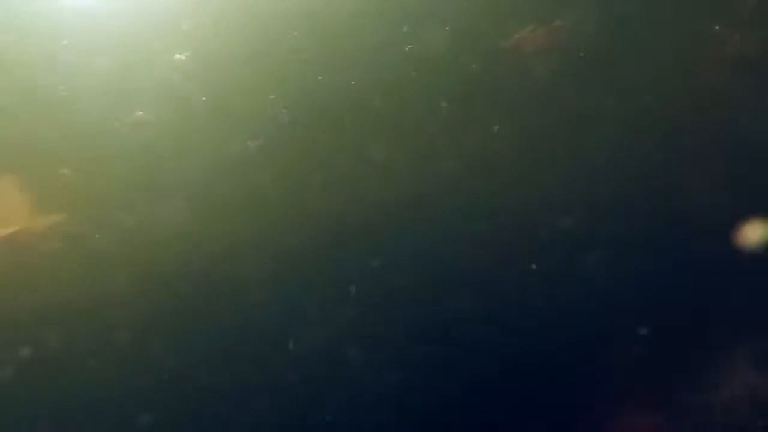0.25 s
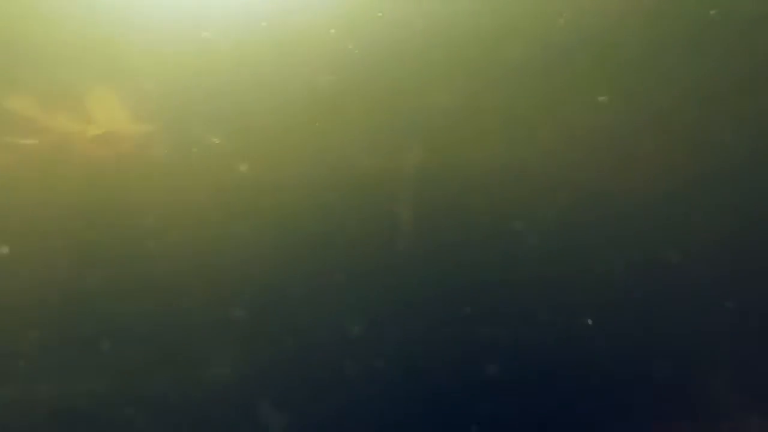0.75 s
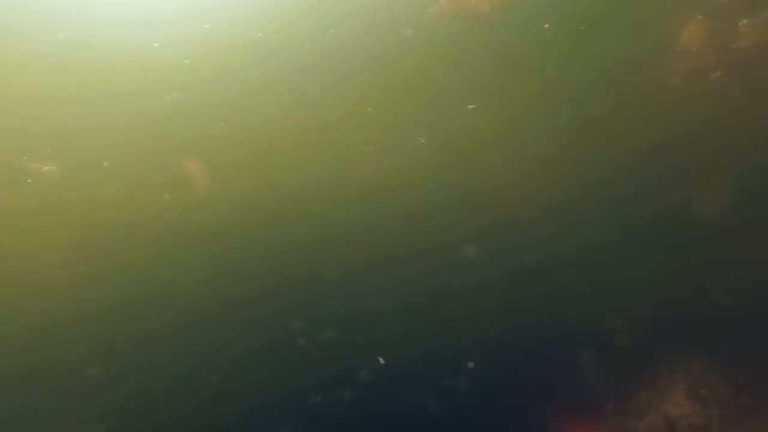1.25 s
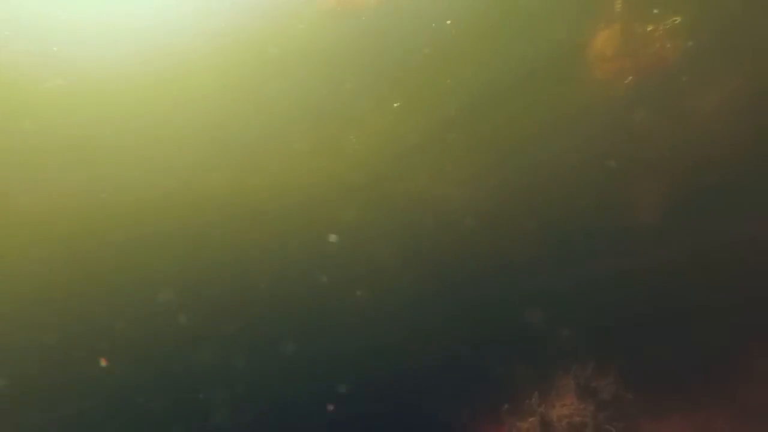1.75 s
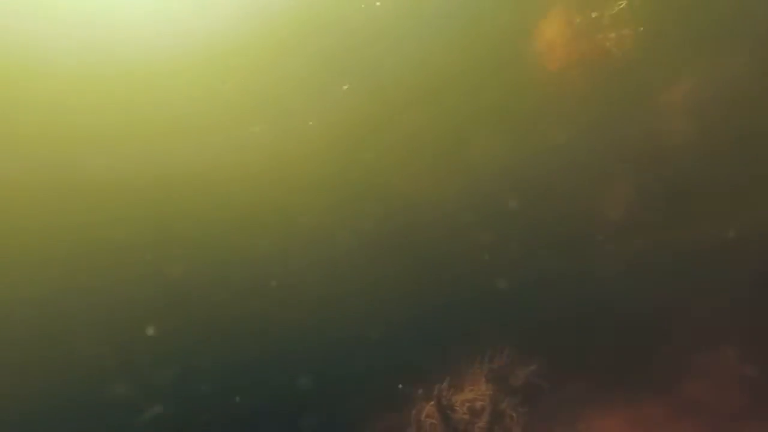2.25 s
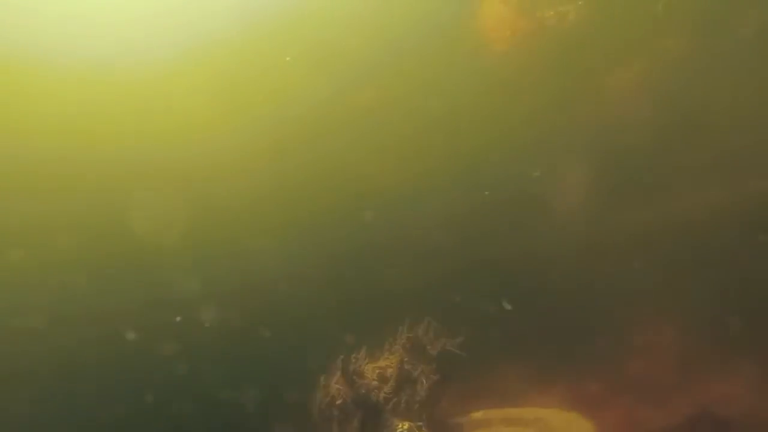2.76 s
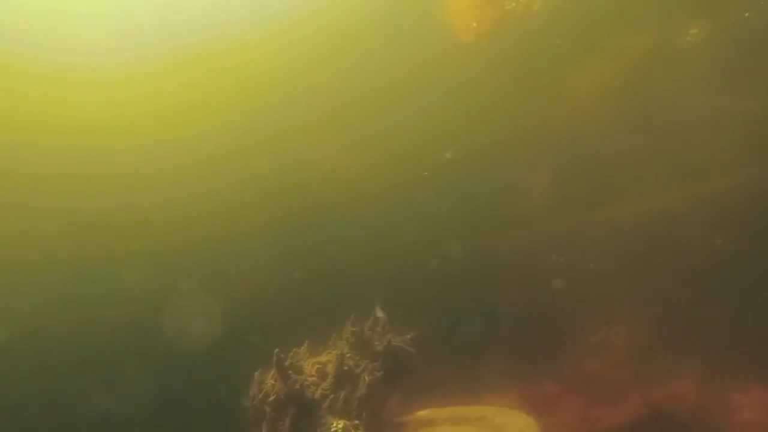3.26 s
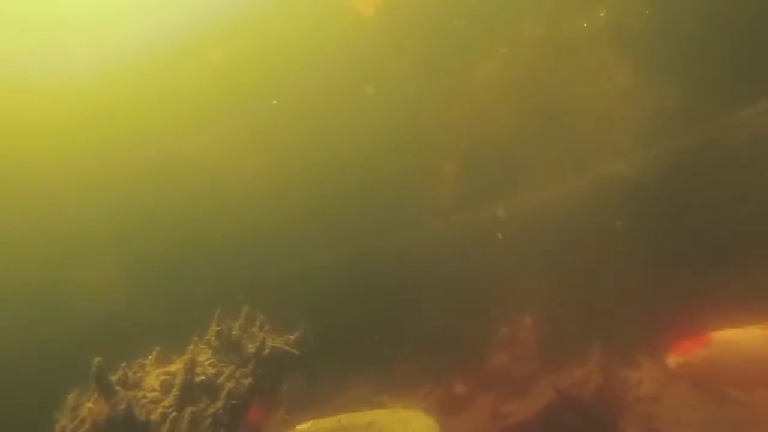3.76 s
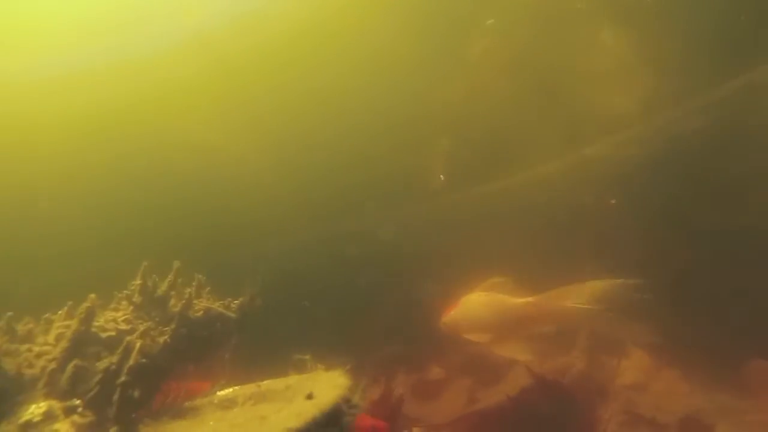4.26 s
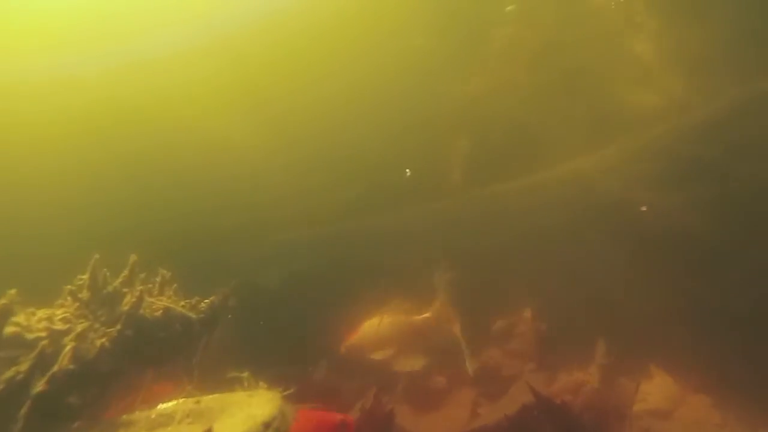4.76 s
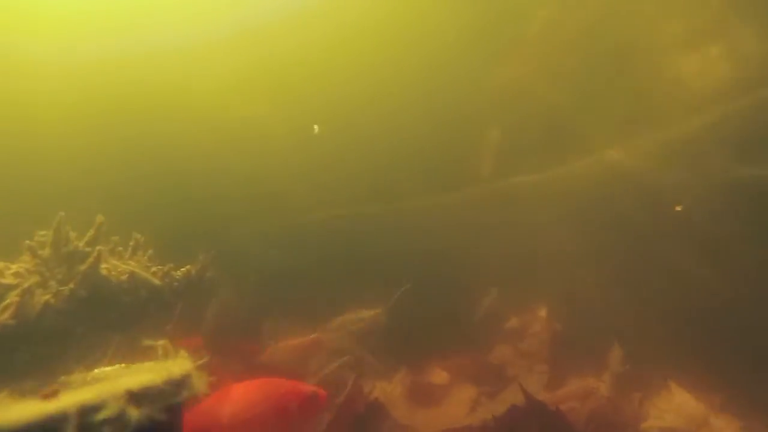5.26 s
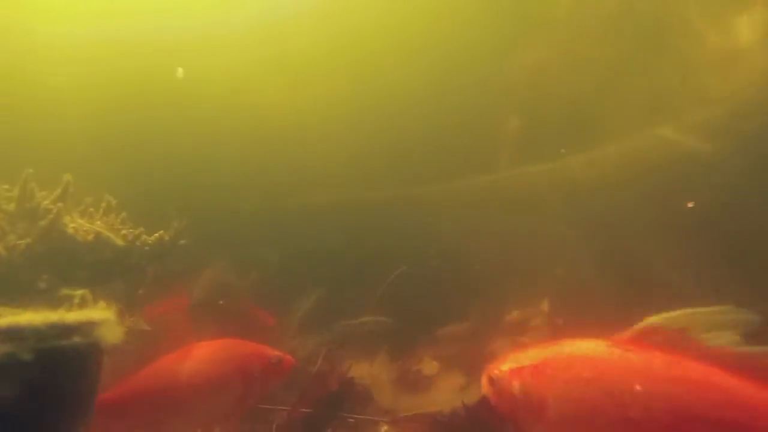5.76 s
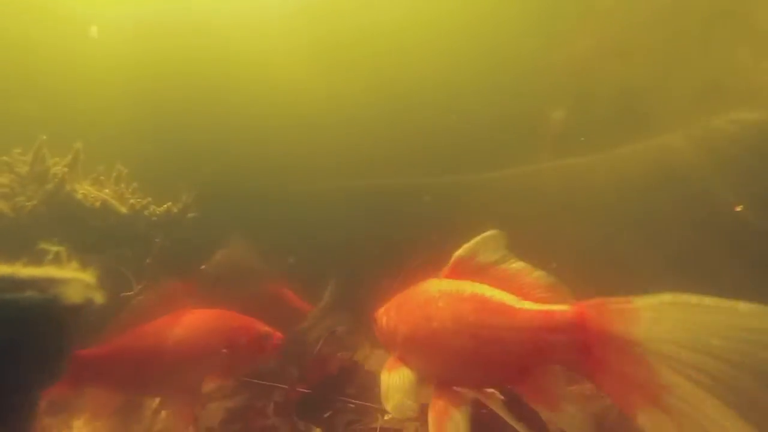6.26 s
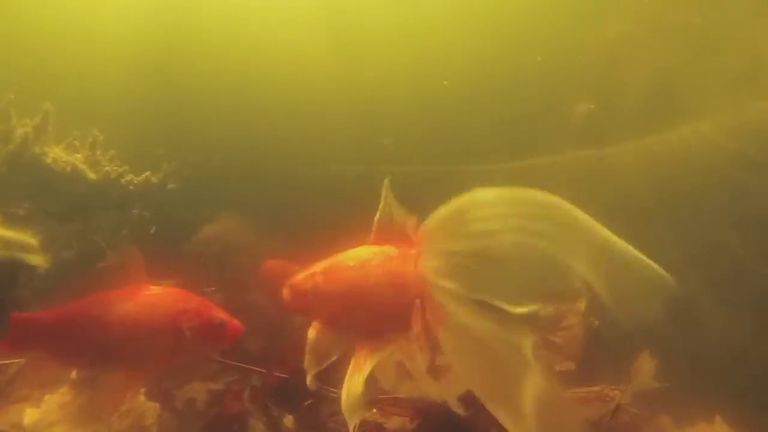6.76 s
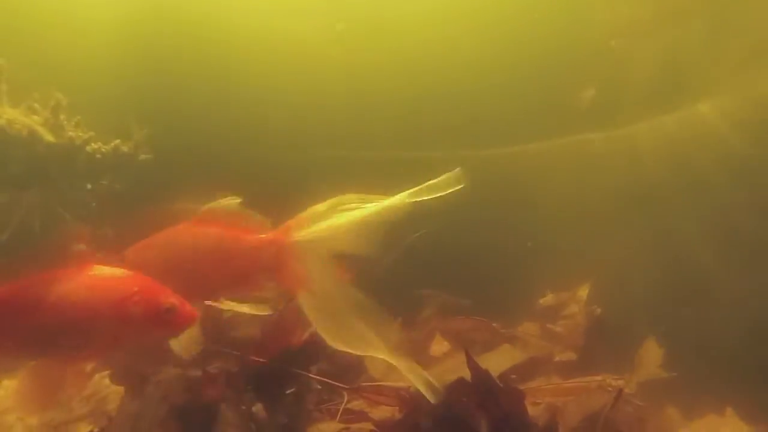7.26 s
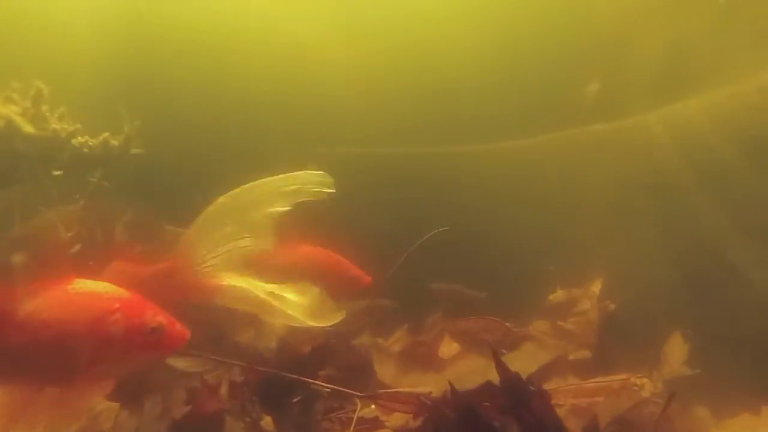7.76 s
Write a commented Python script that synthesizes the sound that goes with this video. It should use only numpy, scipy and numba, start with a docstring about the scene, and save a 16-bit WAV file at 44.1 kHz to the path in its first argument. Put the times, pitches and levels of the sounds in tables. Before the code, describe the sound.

A microphone in a plastic housing is lowered into a garden pond. Water sloshes and bubbles, then closes over it with a loud, deep gulp. Underwater, a pump hums low with a light rattle. A dull bump and a cluster of hard knocks hit the housing. The hum then grows as the rattle recedes, with scattered bubbles, ticks and rubs, and faint scrapes at the end.

```python
"""A microphone in a plastic housing sinks into a garden pond, where a mains-driven pump hums and rattles.
At first the water sloshes and bubbles ring as air springs; near 0.9 s it gulps shut and the housing
wobbles. A dull bump follows at 1.9 s. From 2.65 s the pump changes colour with depth, and near 3 s hard
knocks ring the housing's modes; a limiter ducks after the loudest peaks and creeps back. Then the hum
grows and the rattle recedes amid scattered bubbles, ticks and rubs, and soft scrapes come last."""
import sys
import numpy as np
from scipy import signal
from scipy.fft import rfft, irfft
from scipy.io import wavfile
from scipy.ndimage import uniform_filter1d, minimum_filter1d
from numba import njit

SR = 44100
rng = np.random.default_rng(int(sys.argv[2]) if len(sys.argv) > 2 else 0)


def log_audio(samples):
    """Write samples as a 16-bit WAV file to the path given in sys.argv[1]."""
    # one column per channel
    frames = np.atleast_2d(samples).T
    # limit to full scale, then quantise
    limited = np.clip(frames, -1, 1)
    pcm = np.round(limited * 32767).astype(np.int16)
    wavfile.write(sys.argv[1], SR, pcm)


N = 353682
T = np.arange(N) / SR

# big air pockets trapped as the water closes: (time [s], ring gain [dB], splash level [dB])
GULPS = [(.812, -5.5, -36), (.916, -3, -29.5), (.968, 3, -29)]


def undb(db):
    """Decibels to amplitude ratio."""
    return np.exp(np.asarray(db) * (np.log(10) / 20))


def unit(x):
    """Normalisation to rms 1."""
    return x / np.sqrt(np.mean(x ** 2))


def curves(rows):
    """Linear interpolation of each column of a table over time."""
    times, *columns = np.transpose(rows)
    return [np.interp(T, times, column) for column in columns]


def colour(x, points):
    """Minimum-phase filtering by a response of (frequency [Hz], level [dB]) points; rms 1."""
    hz, db = np.transpose(points)
    size = 4096
    octave = np.log2(np.maximum(np.fft.rfftfreq(size, 1 / SR), 1))
    outside = np.abs(octave - np.clip(octave, np.log2(hz[0]), np.log2(hz[-1])))
    response_db = np.interp(octave, np.log2(hz), db) - 20 * outside
    cepstrum = irfft(np.log(undb(response_db)))
    cepstrum[1:size // 2] *= 2  # folding the cepstrum makes the filter causal
    cepstrum[size // 2 + 1:] = 0
    impulse_response = irfft(np.exp(rfft(cepstrum)))
    return unit(signal.fftconvolve(x, impulse_response)[:N])


def band(x, hz, octaves):
    """Band-pass filtering about a geometric centre frequency."""
    edges = np.minimum(hz * 2 ** (octaves * np.array([-.5, .5])), SR / 2 - 1)
    return signal.lfilter(*signal.butter(3, edges, "bandpass", fs=SR), x)


def noise():
    """Gaussian white noise."""
    return rng.standard_normal(N)


def walk(rate):
    """Random modulation: `rate` values a second, linearly joined, with a spread near 1."""
    steps = T * rate
    count = int(steps[-1]) + 2
    return 1.2 * np.interp(steps, np.arange(count), rng.standard_normal(count))


def add(track, start, sound):
    """Superposition of a sound on a track from `start` seconds."""
    i = max(int(start * SR), 0)
    track[i:i + len(sound)] += sound[:N - i]


def fade(t, t60):
    """Exponential free decay, 60 dB down after t60."""
    return np.exp(-np.log(1000) * t / t60)


def bell(time, half):
    """Gaussian envelope of height 1 with a standard deviation of `half` seconds."""
    return np.exp(-.5 * np.minimum(((T - time) / half) ** 2, 40))


def ping(t, hz, t60):
    """Impulse response of a damped oscillator."""
    return fade(t, t60) * np.sin(2 * np.pi * hz * t)


def rumble():
    """Flow noise: water passing the moving housing makes low, random pressure fluctuations."""
    # spectrum of the flow: (frequency [Hz], relative level [dB])
    spectrum = [(10, 1.5), (25, -0.5), (55, -1.5), (90, -3.5), (160, -9.5), (230, -12), (400, -27)]
    # strength of the flow: (time [s], level [dB])
    flow = [(0, -41), (.3, -37), (.6, -36.5), (1.3, -31.5), (1.9, -30), (2.8, -29.5), (3.25, -30),
            (3.6, -30.5), (4.05, -26), (4.5, -28.5), (5.1, -28.5), (5.7, -29.5), (6.4, -32), (7.2, -31),
            (8, -29)]
    return colour(noise(), spectrum) * undb(curves(flow)[0] + 1.8 * walk(2.826))


def crackle(per_s=40, lowest_hz=2600, cycles=9):
    """Shot noise: faint damped pings at random times, with power-law amplitudes."""
    out, t = np.zeros(N), T[:SR // 50]
    for when, pitch, rank in rng.random((int(per_s * N / SR), 3)):
        hz = lowest_hz * 4 ** pitch
        db = -51 - 3.2 * np.log(rank + .01)
        add(out, when * N / SR, undb(db) * ping(t, hz, cycles / hz))
    return out


def fizz(count=1400, lowest_hz=5000, cycles=20):
    """Resonance of tiny bubbles against the housing: the smallest are highest and faintest."""
    out, t = np.zeros(N), T[:SR // 100]
    for when, pitch, rank in rng.random((count, 3)):
        hz = lowest_hz * 2.4 ** pitch
        db = -51 - 3 * np.log(rank + .005) - 7 * pitch
        onset = np.minimum(t * hz, 1)
        add(out, when * N / SR, undb(db) * onset * ping(t, hz, cycles / hz))
    return out


def ticks_and_pops():
    """Noise transients: tiny bursting bubbles spit brightly, larger air pockets give a dull pop."""
    # bubbles bursting on the housing: (time [s], peak level [dB])
    bursts = [(.209, -37.5), (.315, -45), (.357, -39), (0.458, -39), (.478, -39), (.58, -41), (1.42, -44),
              (1.52, -42), (1.555, -41), (1.655, -39), (1.755, -41), (2.013, -40), (2.235, -42),
              (2.39, -39.5), (2.587, -38), (2.621, -42), (2.764, -41), (2.896, -35.5), (3.92, -41),
              (4.543, -36.5), (4.634, -39), (5.151, -43), (5.4, -41), (5.52, -40), (5.782, -40.5),
              (5.915, -36), (6.29, -41), (7.344, -42), (7.438, -46)]
    # air pockets slipping off the housing: (time [s], peak level [dB])
    pops = [(1.105, -33), (1.288, -29), (1.321, -37), (1.347, -37), (1.638, -28.5), (2.588, -33),
            (2.621, -27), (2.763, -27.5), (2.896, -29)]
    out, t = np.zeros(N), T[:SR // 30]
    spit = colour(noise(), [(3000, 11.5), (4100, 6), (5500, 0), (7000, 2), (8200, -12.5),
                            (9500, -5.5), (13000, -16)])
    puff = colour(noise(), [(900, -10), (1400, 5), (1750, -0.5), (2200, -5), (3050, -1),
                            (3700, -13), (7000, -24.5)])
    for time, db in bursts:
        tick = np.roll(spit, int(time * SR))[:len(t)] * fade(t, t60=.024)
        tick = band(tick, rng.uniform(5000, 9500), octaves=.6) + .4 * tick  # each has its own pitch
        add(out, time, undb(db) * tick / np.abs(tick).max())
    for time, db in pops:
        pop = np.roll(puff, int(time * SR))[:len(t)] * fade(t, t60=.03)
        add(out, time, undb(db) * pop / np.abs(pop).max())
    return out


def clicks():
    """Fast-decaying noise bursts: sharp clicks, and one thin, full-band digital snap at 3.44 s."""
    # clicks and the snap: (time [s], peak level [dB], centre frequency [Hz], bandwidth [octaves])
    events = [(.010, -24, 3260, 0.28), (.027, -20, 2650, 0.82), (.142, -45, 12500, 0.27),
              (.221, -34.5, 3830, 1.5), (0.735, -27.5, 4650, 0.38), (.959, -24.5, 6960, 1.4),
              (1.057, -20.5, 3380, 0.99), (3.437, -34, 7000, 2.9), (4.485, -33, 4360, 1.3),
              (4.580, -36, 7500, 0.26), (5.64, -37, 2000, 1.3), (6.034, -34.5, 3960, 1.16),
              (6.339, -42, 11100, .25), (7.821, -40, 9200, 0.49)]
    out, t = np.zeros(N), T[:SR // 50]
    for time, db, hz, octaves in events:
        click = band(rng.standard_normal(len(t)) * fade(t, t60=.015), hz, octaves)
        add(out, time, undb(db) * click / np.abs(click).max())
    return out


def pump(mains_hz=59.97, sink_start_s=2.65, sink_s=2.15, drift_end_s=6.5):
    """Forced vibration: the motor hums at twice the mains rate; its rotor knocks and stirs in step."""
    # the pump as the housing drifts, before offsets: (time [s], hum [dB], octave [dB], churn [dB])
    levels = [(0.0, -35, -45, -22), (0.438, -29, -33.5, -19.5), (0.608, -32, -33, -19.5),
              (0.7, -27.5, -31.5, -21), (1.4, -27, -35, -26.5), (2.656, -28.5, -34, -33.5),
              (2.88, -25, -35, -31.5), (3.4, -25, -39.5, -40.5), (3.55, -23, -37.5, -39.5),
              (3.86, -23.5, -42.5, -40), (4.38, -32.5, -30, -36.5), (4.56, -32, -30.5, -35.5),
              (5.45, -21.5, -30, -37.5), (5.78, -18.5, -33, -37), (6.1, -18.5, -35.5, -37),
              (6.47, -18.5, -35.5, -39), (7.58, -20.5, -37.5, -42), (8.02, -23.5, -39, -39.5)]
    # steady lines: (multiple of the mains frequency, shallow level [dB], deep level [dB])
    harmonics = [(1, -57, -54), (3, -43, -37.5), (5, -43, -55.5), (6, -46.5, -55), (7, -52.5, -50.5),
                 (8, -41.5, -62.5), (9, -53, -56.5), (10, -48, -44.5), (13, -51.5, -68.5), (15, -58, -76.5),
                 (17, -62, -78), (23, -67.5, -78.5), (27, -66.5, -81)]
    # brief changes in the rattle: (time [s], half length [s], gain [dB])
    flares = [(0.372, 0.038, 9.5), (.476, 0.0043, -5), (0.548, 0.0074, 6.5), (0.646, 0.0042, 15),
              (3.542, 0.0049, 11)]
    # spectra of stirred water, rattle and hiss: (frequency [Hz], relative level [dB])
    churn_shallow = [(150, -8.5), (215, -8), (270, -6), (360, -2.5), (400, -5), (490, -2), (600, 4.5),
                     (680, -9.5), (770, -10.5), (850, -17), (1300, -30.5)]
    churn_deep = [(150, -5.5), (270, -7), (340, -9), (390, -7.5), (460, 3), (540, 1.5), (610, 1.5),
                  (710, -8), (800, -18.5), (1100, -25)]
    rattle_shallow = [(600, 5.5), (780, -11.5), (1000, -6), (1200, -10), (1700, 2.5), (2070, -9.5),
                      (2200, 8.5), (2390, 2.5), (2560, -9), (2870, -6), (3170, -3), (3310, -17.5),
                      (3520, -6), (4100, -29), (8000, -44.5)]
    rattle_deep = [(600, -19), (900, -2), (1400, 1.5), (1900, 3), (2380, 5.5), (2500, 9.5), (2620, 0),
                   (2830, 7), (3000, -5), (3170, 5.5), (3330, -8.5), (3480, 1.5), (3700, -7), (3920, 0),
                   (4400, -25.5), (5100, -12.5), (6000, -31.5), (8000, -25)]
    hiss_spectrum = [(2000, -14), (4000, 3.5), (4600, -1.5), (5050, 3), (5900, -3), (6300, -3.5), (6750, 2),
                     (7500, -3.5), (8300, -12), (8800, -11), (9500, -5.5), (10200, -10.5), (12000, -11.5),
                     (15000, -23)]

    hum_db, octave_db, churn_db = curves(levels)
    depth = np.clip((T - sink_start_s) / sink_s, 0, 1)
    shallow, deep = np.sqrt(1 - depth), np.sqrt(depth)  # equal-power crossfade
    flare_db = sum(db * bell(time, half) for time, half, db in flares)
    churn_db = churn_db - 1.5 + .24 * flare_db
    # the rattle fades as the housing drifts off and sinks
    rattle_db = -40.5 - 1.88 * np.minimum(T, drift_end_s) - 2 * depth + flare_db

    turns = mains_hz * T + .0057 * walk(9)
    line = lambda k, db: np.sqrt(2) * undb(db) * np.cos(2 * np.pi * k * turns)
    hum = line(2, hum_db + 1.14) + line(4, octave_db - 1.5)
    for k, shallow_db, deep_db in harmonics:
        hum += line(k, shallow_db + depth * (deep_db - shallow_db) + 2 * walk(7.6))

    # two strokes a turn, forwards and backwards, one a little stronger, no two alike
    stroke = np.floor(2 * turns).astype(int)
    side = np.cos(np.pi * stroke)
    force = undb(1.2 * noise()[stroke] + .84 * side)
    taps = unit(np.diff(stroke, prepend=stroke[0]) * force)
    # turbulence swells with every stroke; deeper down the strokes blur into it
    surge = force * np.cos(np.pi * (2 * turns - .08)) ** 4
    turbulence = lambda steady: unit(noise() * (steady + surge))
    churn = shallow * colour(.5 * taps + .71 * turbulence(steady=1), churn_shallow)
    churn += deep * colour(.42 * taps + turbulence(steady=1), churn_deep)
    rattle = shallow * colour(.38 * taps * side + turbulence(steady=.55), rattle_shallow)
    rattle += deep * colour(turbulence(steady=.94), rattle_deep)
    hiss = colour(turbulence(steady=3) * undb(.8 * walk(40) + 1.6 * walk(600)), hiss_spectrum)
    return hum + churn * undb(churn_db + .8 * walk(25)) + rattle * undb(rattle_db) + hiss * undb(-60.5)


def slosh(per_s=200, lowest_hz=867, octaves=1.8, cycles=19):
    """Air entrainment: water closing round the housing rings with brief bubbles, the higher fainter."""
    # wet crackle near the surface: (time [s], gain [dB])
    envelope = [(0, -29), (.2, -32.5), (.38, -24), (.55, -38.5), (.8, -33.5), (1.0, -36), (1.15, -50),
                (1.6, -58)]
    out, t = np.zeros(N), T[:SR // 30]
    end = envelope[-1][0]
    for when, pitch, rank in rng.random((int(per_s * end), 3)):
        hz = lowest_hz * 2 ** (octaves * pitch)
        db = -2.6 * np.log(rank + .02) - 5 * pitch
        onset = np.minimum(t * hz, 1)
        add(out, when * end, undb(db) * onset * ping(t, hz, cycles / hz))
    return out * undb(curves(envelope)[0])


def swishes(splash_delay_s=.0093, splash_half_s=.012, splash_hz=1690, splash_octaves=1.8):
    """Friction and splash noise: grainy rubs, each gulp's splash, scrapes on the housing's resonances."""
    # water and fingers brushing the housing:
    # (time [s], half length [s], level [dB], centre frequency [Hz], bandwidth [octaves])
    rubs = [(.64, 0.052, -22, 154, 0.59), (.805, 0.05, -23.5, 150, 1.56), (1.0, 0.043, -21.5, 125, 0.94),
            (2.963, 0.0016, -18, 1430, 0.97), (2.9775, 0.005, -16, 1300, 4.2),
            (3.1115, 0.0049, -28.5, 1500, 3.6), (3.111, 0.0022, -46, 5500, 1.2),
            (3.325, 0.0091, -29.5, 553, 1), (3.64, 0.019, -34, 610, 0.6), (4.8, 0.11, -45, 2570, 2.1),
            (4.89, 0.022, -46, 1550, 0.36), (1.69, 0.031, -42.5, 1600, 1.8), (1.887, 0.013, -42, 1900, 1.3),
            (5.082, 0.0062, -38, 1700, 1.4), (6.232, 0.016, -52, 2560, 0.72)]
    # soft scrapes: (time [s], level [dB])
    scrapes = [(7.543, -50.5), (7.565, -50), (7.582, -54), (7.76, -48.5), (7.778, -49), (7.823, -48),
               (7.841, -50), (7.888, -48), (7.928, -48.5), (7.946, -50)]
    # resonances a scrape excites: (frequency [Hz], relative level [dB])
    scrape_spectrum = [(2000, -11), (2330, -9), (2510, 5.5), (2800, -15), (3130, -6), (3600, -14.5),
                       (3900, -10), (4600, -26), (5000, -16), (6100, -27), (6700, -13), (7500, -16),
                       (8400, -32), (9400, -25), (10200, -33)]
    out = np.zeros(N)
    grain_spectrum = [(400, 3), (1300, 6.5), (3200, 0), (4300, -1.5), (5600, -2),
                      (7000, -1.5), (14000, -10)]
    grain = colour(noise() * undb(4.3 * walk(700)), grain_spectrum)
    splashes = [(time + splash_delay_s, splash_half_s, db, splash_hz, splash_octaves)
                for time, _, db in GULPS]
    for time, half, db, hz, octaves in [*rubs, *splashes]:
        span = np.abs(T - time) < 4 * half
        out[span] += undb(db) * bell(time, half)[span] * unit(band(grain[span], hz, octaves))
    rasp = colour(noise() * undb(4.4 * walk(900)), scrape_spectrum)
    return out + rasp * sum(undb(db) * bell(time, half=.013) for time, db in scrapes)


def wobble(sway_hz=27, settle_db_per_s=6.5, attack_s=.038, t60=.57, sag_hz=1.8):
    """Softening oscillator: the shoved housing rocks, more slowly in wide swings, and stirs up eddies."""
    # shoves: (time [s], small-swing frequency [Hz], peak level [dB], hold [s])
    shoves = [(0.751, 23.6, -12, 0.014), (0.853, 28, 6, 0.065), (2.981, 28, -9, .005)]
    amplitude = undb(-32 - settle_db_per_s * T)  # a gentle sway that settles
    sway_phase = 2 * np.pi * np.cumsum(sway_hz + 2 * walk(3.2)) / SR
    swing = amplitude * np.sqrt(2) * np.sin(sway_phase)
    t = T[:SR]
    for time, hz, db, hold in shoves:
        attack = np.sin(np.pi / 2 * np.minimum(t / attack_s, 1))
        size = undb(db) * attack * fade(np.maximum(t - attack_s - hold, 0), t60)
        phase = 2 * np.pi * np.cumsum(hz - sag_hz * size) / SR
        add(swing, time, -size * np.sin(phase))
        add(amplitude, time, size)
    eddies = colour(noise(), [(30, 3), (60, 3), (85, -2), (130, 7), (200, -13),
                              (450, -11.5), (900, -28.5)])
    return swing + undb(-13.5) * amplitude * eddies


def struck(modes, contact):
    """Modal response to a force pulse: a longer contact excites only the low modes."""
    t = T[:SR // 3]
    ring = sum((-1) ** k * undb(db) * ping(t, hz, t60) for k, (hz, db, t60) in enumerate(modes))
    push = t * np.exp(-t / (contact / np.pi))
    return signal.fftconvolve(ring, push / push.sum())[:len(t)]


def knocks(hard_contact_s=.0001):
    """Impact excitation: blows ring the housing, short contacts crack too, and water muffles the bumps."""
    # knocks and dull bumps on the housing: (time [s], gain [dB], contact time [s])
    blows = [(2.9618, 7, 0.0016), (2.9677, -7, 0.00021), (2.9762, 3, 0.00013), (2.9794, -6, 0.0002),
             (3.022, -29.5, 0.00015), (3.061, -27, 0.00018), (3.074, -29, 0.00014), (3.11, -22.5, 0.0002),
             (3.314, -11, 0.0011), (3.598, -17, 0.0015), (3.6069, -7.5, 0.0028), (3.615, -19, .002),
             (3.645, -13.5, 0.0014), (5.076, -31, 0.00028)]
    bumps = [(1.859, -1.5, 0.0021), (1.877, -16, .0006), (1.8843, -7, 0.00072), (1.893, -16, 0.00086)]
    # modes that each kind excites: (frequency [Hz], relative level [dB], t60 [s])
    housing_modes = [(150.1, -4.5, 0.34), (217, -4.5, 0.035), (279, -6, 0.088), (337, -15.5, 0.15),
                     (582, -1.5, 0.02), (860, -9.5, 0.054), (1125, -9, 0.03), (1360, -10, 0.027),
                     (1830, -2.5, 0.022), (2170, -6, 0.025), (2880, -3.5, 0.022), (4170, -6, .012),
                     (6800, -2, .011), (9500, -13, .0095)]
    bump_modes = [(270, -4, 0.026), (344, -2.5, 0.1), (420, 3, 0.022), (527, 3, 0.018), (696, -4.5, 0.071),
                  (1090, -12, 0.024)]
    out, t = np.zeros(N), T[:SR // 3]
    grit = colour(noise(), [(500, 12.5), (1500, 13.5), (3500, -15), (4800, -6), (5600, -21),
                            (6800, -.5), (8800, -22), (9700, -10), (15000, -31)])
    for time, db, contact in blows:
        crack_db = 5.5 - 9 * np.log2(contact / hard_contact_s)
        crack = undb(crack_db) * fade(t, t60=.02) * np.roll(grit, int(time * SR))[:len(t)]
        add(out, time, undb(db) * (struck(housing_modes, contact) + crack))
    for time, db, contact in bumps:
        add(out, time, undb(db) * struck(bump_modes, contact))
    return out


def bubble(hz, swell, t60, overtone_db, pitch_rise=.03):
    """Mass-spring resonance of air in water: the ring swells and rises; jostling water roughens it."""
    t = T[:SR // 5]
    jostle = walk(350)[:len(t)]
    frequency = hz * (1 + pitch_rise * np.minimum(t / t60, 1) + .025 * jostle)
    phase = 2 * np.pi * np.cumsum(frequency) / SR
    attack = np.sin(np.pi / 2 * np.minimum(t / swell, 1))
    envelope = attack * fade(np.maximum(t - swell, 0), t60) * undb(.5 * jostle)
    return envelope * np.sin(phase) + undb(overtone_db) * envelope ** 2 * np.sin(2.3 * phase)


def bubbles():
    """Free oscillation: single bubbles gurgle round the housing, each at its natural frequency."""
    # bubbles: (time [s], frequency [Hz], level [dB], swell [s], t60 [cycles], relative overtone [dB])
    events = [(.027, 1350, -16.5, 0.00093, 14, -21), (.080, 1615, -25, 0.0063, 25, -35),
              (.135, 1680, -19.5, 0.0011, 24, -32), (.143, 609, -12.5, 0.0063, 90, -33),
              (.165, 1430, -21.5, .0016, 30, -40), (.208, 1280, -21.5, .0017, 25, -25),
              (.268, 627, -7.5, 0.004, 42, -30), (.372, 602, -15.5, 0.0025, 34, -25),
              (.497, 569, -13.5, 0.022, 37, -37), (.548, 598, -12, 0.0023, 77, -44),
              (.706, 1640, -9, 0.0024, 34, -39), (0.708, 1045, -16, .001, 22, -28),
              (.773, 2010, -24, 0.00088, 28, -27), (.841, 1630, -22, 0.0016, 33, -14.5),
              (.915, 1280, -25, 0.0011, 18, -24), (0.923, 1005, -18, .008, 60, -35),
              (.952, 2150, -17, .001, 35, -34), (1.001, 1140, -8, 0.0027, 34, -30),
              (1.017, 1326, -8, .003, 59, -40), (1.053, 1500, -12.5, 0.0012, 24, -43),
              (1.054, 2140, -12, 0.0015, 25, -31), (1.077, 1870, -19, 0.001, 18, -34),
              (3.106, 566, -11.5, 0.0059, 8.7, -7), (3.312, 563, -12, 0.0044, 39, -33),
              (3.313, 1290, -37, .002, 25, -26), (3.515, 615, -20, 0.0026, 34, -30),
              (3.514, 1490, -30.5, .0015, 30, -23), (3.590, 573, -19.5, 0.0044, 86, -30),
              (3.602, 1270, -36.5, .003, 28, -22), (3.607, 708, -22.5, 0.0038, 48, -20),
              (3.824, 4010, -27, 0.0045, 90, -43), (4.063, 610, -9.5, 0.0071, 38, -31),
              (4.064, 1505, -23, 0.0025, 30, -16), (4.066, 748, -22.5, 0.0042, 40, -30),
              (4.141, 2400, -25, 0.0012, 25, -35), (4.141, 2970, -23.5, .002, 82, -40),
              (4.141, 1540, -27, 0.004, 42, -17), (5.073, 590, -13.5, 0.0067, 25, -28),
              (5.081, 716, -26, 0.0045, 34, -37), (5.073, 1475, -23.5, 0.0026, 38, -25),
              (5.074, 2560, -30.5, .003, 35, -30), (6.083, 3780, -38.5, 0.0023, 35, -38),
              (6.332, 3900, -41.5, .002, 70, -40)]
    out = np.zeros(N)
    for time, hz, db, swell, cycles, overtone_db in events:
        add(out, time, undb(db) * bubble(hz, swell, cycles / hz, overtone_db))
    return out


def gulps():
    """Modal superposition: big air pockets ring with many partials as the housing goes under."""
    # partials of an air pocket: (frequency [Hz], relative level [dB], swell [s], t60 [s])
    partials = [(297, -10, 0.021, 0.26), (578, -8, 0.0051, 0.18), (695, 1.5, 0.027, 0.066),
                (716, -13.5, 0.016, .25), (997, -24.5, 0.0062, 0.15), (1333, -24.5, 0.013, 0.081),
                (2520, -31, 0.0046, 0.11), (3200, -37, .003, 0.073)]
    out = np.zeros(N)
    for time, db, _ in GULPS:
        for hz, partial_db, swell, t60 in partials:
            add(out, time, undb(db + partial_db) * bubble(hz, swell, t60, overtone_db=-45))
    return out


def scene():
    """Linear superposition: all sources add into one channel."""
    background = rumble() + pump()
    water = bubbles() + gulps() + slosh() + fizz() + ticks_and_pops()
    transients = clicks() + crackle()
    housing = knocks() + swishes() + wobble()
    return (background + water + transients + housing)[None]


@njit
def held_peak(size, release):
    """Envelope follower with instant attack and exponential release."""
    out, held = np.empty(len(size)), 0.
    for i in range(len(size)):
        held = max(size[i], held * release)
        out[i] = held
    return out


def record(dry, ceiling=.8, recovery_db_per_s=36, cutoff_hz=15300):
    """Peak limiting: the gain ducks at loud peaks and creeps back; a low-pass filter cuts the top."""
    peak = held_peak(np.abs(dry[0]), float(undb(-recovery_db_per_s / SR)))
    gain = minimum_filter1d(ceiling / np.maximum(peak, ceiling), size=129)
    gain = uniform_filter1d(uniform_filter1d(gain, size=65), size=65)
    low_pass = signal.ellip(8, .2, 70, cutoff_hz, fs=SR, output="sos")
    return signal.sosfilt(low_pass, dry * gain)


dry = scene()
out = record(dry)
log_audio(out)
```